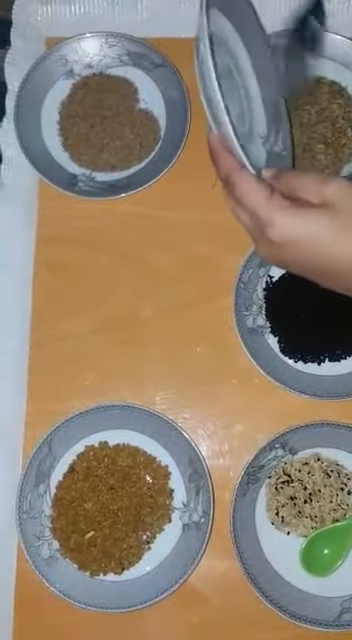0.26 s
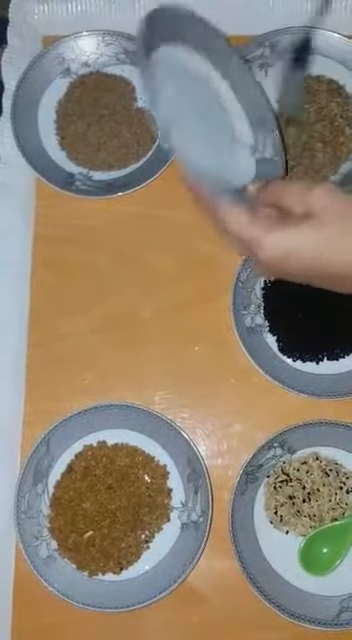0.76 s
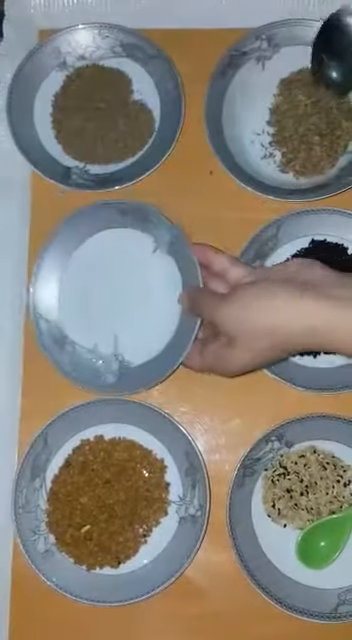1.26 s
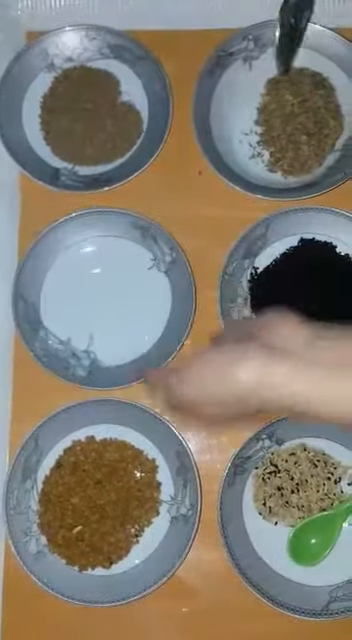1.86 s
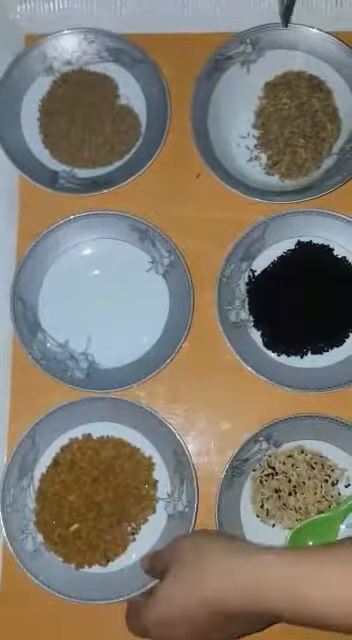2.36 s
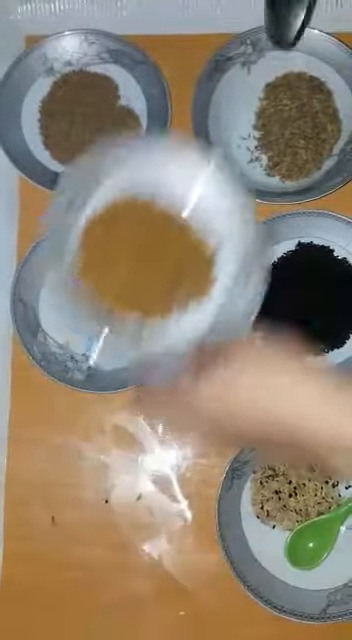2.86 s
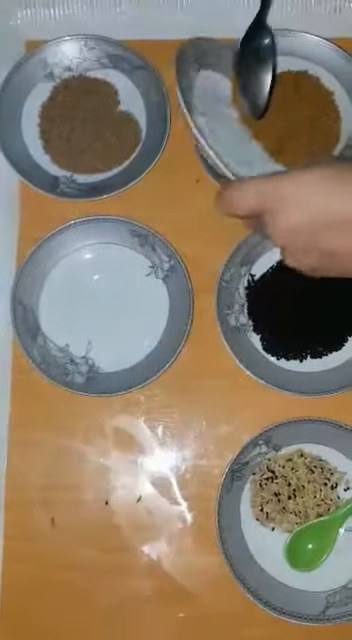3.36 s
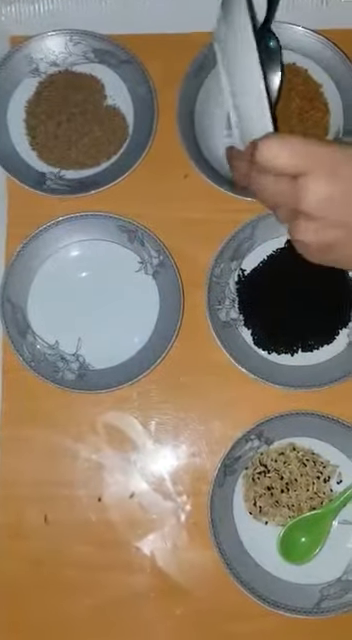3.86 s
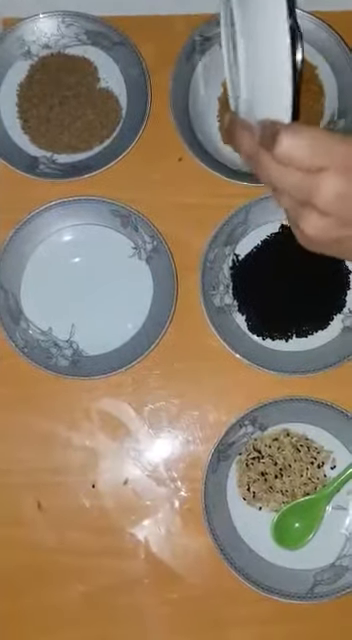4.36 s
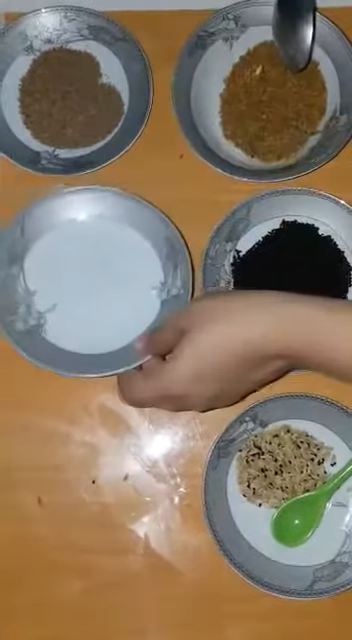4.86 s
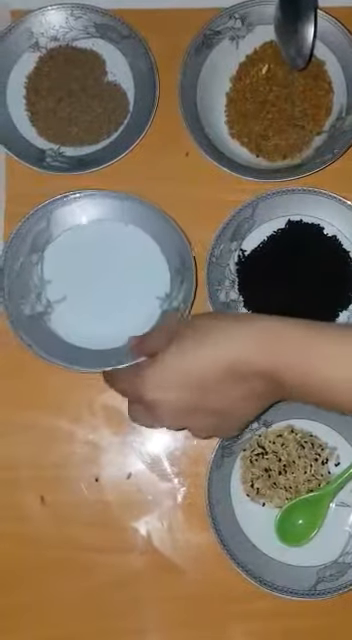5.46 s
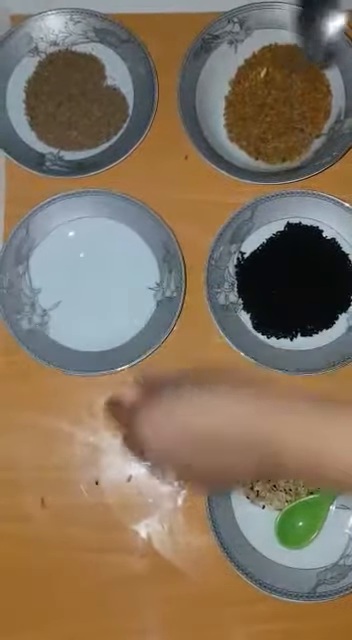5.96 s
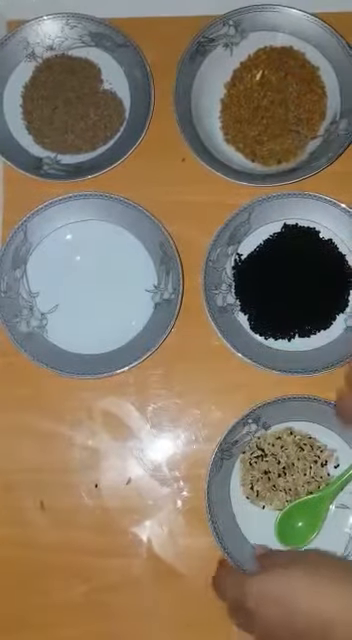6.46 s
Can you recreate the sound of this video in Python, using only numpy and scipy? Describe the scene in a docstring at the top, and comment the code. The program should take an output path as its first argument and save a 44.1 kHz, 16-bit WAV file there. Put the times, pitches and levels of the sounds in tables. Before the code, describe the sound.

In a small hard room with a steady low motor hum and faint hiss, a steel spoon rasps and clinks on a ceramic plate. The plate lands on a wooden table with a double knock and scuffs into place. Seeds then hiss from a second plate with a brief thin squeak, more spoon clinks follow, and that plate is clacked down and nudged. Close stereo microphone.

```python
"""A slow motor hums under everything, with room air and a thin band of hiss: summed partials and shaped noise.
First a steel spoon taps and scrapes a ceramic plate clean: ringing modes, and slip grains through resonances.
The plate is set down on a wooden table, knocking, dragging and nudged into place: board, plate and glaze modes.
Seeds are tipped from a second plate as filtered grains; its rim squeaks on the spoon, which taps and scrapes again.
That plate is set down, rocks and is nudged into place; a small hard room answers all the contacts."""
import sys
import numpy as np
from scipy import signal
from scipy.fft import rfft, irfft
from scipy.io import wavfile
from scipy.ndimage import uniform_filter1d

SR = 44100
rng = np.random.default_rng(int(sys.argv[2]) if len(sys.argv) > 2 else 0)


def generate_wav(sig):
    """Save sig (samples, or channels by samples) to the path in sys.argv[1] as 16-bit PCM at SR."""
    pcm = np.round(np.clip(np.atleast_2d(sig).T, -1, 1) * 32767).astype(np.int16)
    wavfile.write(sys.argv[1], SR, pcm)


N = 296352
T = np.arange(N) / SR
RING_T = np.arange(SR // 2) / SR

# modes of the wooden table: (f/Hz, level/dB, t60/s)
BOARD = [(201, -2.5, 0.031), (262.3, -2, 0.057), (315, -2, 0.067), (423, 1.5, 0.024), (500, -8.5, 0.056),
         (573, 1, 0.032), (720, 6, 0.01), (853, -0.5, 0.028), (1012, 3, 0.011), (1147, -6.5, 0.071),
         (1410, -19, 0.011)]
# modes of a plate damped by the hand: (f/Hz, level/dB, t60/s)
HELD_PLATE = [(840, -6.5, 0.022), (1376, 1, 0.014), (1544, 6.5, 0.023), (1618, 10, 0.016),
              (1868, 4.5, 0.019), (1942, 0, 0.025), (3020, -11, 0.019), (3785, -14.5, 0.0255)]
# modes of a plate tapped or rubbed by the spoon: (f/Hz, level/dB, t60/s)
PLATE = [(1518, -3, .12), (3050, -3, .13), (4690, -13, .12), (6525, -3, .15), (7251, -5, .16),
         (8600, -6, .06), (11000, -15, .06), (12130, -9, .05), (14600, -22, .06)]
# modes of the steel spoon: (f/Hz, level/dB, t60/s)
SPOON = [(4756, 0, .07), (4738, -13.5, .5), (7220, -15, .07), (8350, -20, .03), (9480, -17, .07),
         (11720, -15, .035)]
# colour of a click on the glaze: (f/Hz, density/dB per Hz)
CLICK = [(300, -4.5), (800, -6), (1300, 10), (2200, 3.5), (3200, 0), (3800, -1), (4500, -6), (6000, -11.5),
         (8500, -18), (10500, -28), (15500, -36.5)]
# colour of a small tick, from spoon or grit: (f/Hz, density/dB per Hz)
TICK = [(300, -24), (650, -10), (1000, 1.5), (1400, 2), (1900, 1.5), (2500, -8.5), (3800, -7.5),
        (5000, -5.5), (6000, -17), (7500, -6.5), (10800, -18), (12100, -13.5), (13200, -20), (15500, -22)]


def amp(db):
    """Decibels to linear gain."""
    return 10 ** (np.asarray(db) / 20)


def evened(x):
    """Scales a sound to rms 1."""
    return x / np.sqrt(np.mean(x ** 2) + 1e-20)


def struck(x, size=441):
    """Scales a blow to rms 1 over its first hundredth of a second."""
    return x / np.sqrt(np.mean(x[:size] ** 2))


def read(points, hz):
    """Reads a curve at given frequencies, straight between points on a log-frequency axis."""
    f, value = np.transpose(points)
    return np.interp(np.log(hz + 1), np.log(f + 1), value)


def add(mix, s, sound):
    """Lays a sound into the mix from the given second."""
    part = mix[max(round(s * SR), 0):][:len(sound)]
    part += sound[:len(part)]


def above(x, hz):
    """Fourth-order high-pass."""
    return signal.sosfilt(signal.butter(4, hz, "high", fs=SR, output="sos"), x)


def through(x, response):
    """Sends a sound through a resonating body and scales the result to rms 1."""
    return evened(signal.oaconvolve(x, response)[:N])


def causal(colour, size=2048):
    """Impulse response of a colour, with all its energy as early as possible."""
    hz = abs(np.fft.fftfreq(size, 1 / SR))
    log_gain = np.log(amp(read(colour, hz)))
    minimum_phase = np.exp(np.conj(signal.hilbert(log_gain)))
    return np.fft.ifft(minimum_phase).real


def swell(crest_s, db, rise_s, fall_s):
    """Gain of a movement that gathers to a crest and dies away."""
    width_s = np.where(T < crest_s, rise_s, fall_s)
    return amp(db) * np.exp(-np.minimum(((T - crest_s) / width_s) ** 2, 20))


def diffuse(colour):
    """Noise from all sides: most alike in both channels in the bass, hardly at all in the treble."""
    # left-right likeness of diffuse sound: (f/Hz, likeness 0..1)
    alike = [(100, 0.92), (300, 0.68), (600, 0.61), (1200, 0), (2500, 0.032), (15000, 0.023)]
    hz = np.fft.rfftfreq(N, 1 / SR)
    a, b = rfft(rng.standard_normal((2, N)))
    same = np.clip(read(alike, hz), -1, 1)
    pair = np.array([a, same * a + np.sqrt(1 - same ** 2) * b])
    return evened(irfft(pair * amp(read(colour, hz)), N))


def ring(modes, tuning=1, spread_db=0, favoured_hz=1000, falloff_db=0):
    """Dying sines, neighbours opposed in sign; the spot that is hit favours some modes over others."""
    hz, db, t60 = np.transpose(modes)[:, :, None]
    db = db + spread_db * rng.standard_normal(db.shape)
    db = db - falloff_db * abs(np.log2(hz / favoured_hz))  # dB lost per octave away
    sign = (-1) ** np.arange(len(modes))[:, None]
    decay = np.exp(-np.log(1000) * RING_T / t60)
    sines = np.sin(2 * np.pi * hz * tuning * RING_T)
    return struck((sign * amp(db) * decay * sines).sum(0))


def crack(colour, chatter, decay_s):
    """A sharp contact followed by a brief chatter of the two surfaces."""
    push = chatter * rng.standard_normal(len(RING_T)) * np.exp(-RING_T / decay_s)
    push[0] += 1
    return struck(signal.fftconvolve(push, causal(colour))[:len(push)])


def grains(per_s, spread_db):
    """Tiny contacts at random moments, a few much larger than the rest."""
    size = amp(spread_db * np.minimum(rng.exponential(1, N), 4))
    happens = rng.random(N) < per_s / SR
    return evened(size * rng.choice([-1, 1], N) * happens)


def grip(s):
    """The grip detunes spoon and plate: first plate in hand, second in hand, second on the table."""
    # how they are held: (from t/s, spoon tuning/ratio, plate tuning/ratio)
    grips = [(0, 1, 1), (2.6, 1.029, .975), (4.7, 1.008, 1.015)]
    return [row[1:] for row in grips if row[0] <= s][-1]


def background(motor_db=-54.5, air_db=-53, hiss_db=-62.5):
    """Motor hum on the multiples of its slightly wandering shaft speed, room air and a narrow hiss."""
    # motor partials: (multiple of shaft speed, level/dB)
    partials = [(2, -1), (3, -41), (4, 2), (5, -7), (6, -9.5), (7, -11.5), (8, -16), (9, -10), (10, -15),
                (11, -12), (12, -28), (13, -18.5), (16, -12.5)]
    # colour of the room air: (f/Hz, density/dB per Hz)
    air_colour = [(50, -4), (120, -8), (200, -6.5), (340, -11.5), (650, -12), (1300, -15), (2500, -23),
                  (4500, -32), (6200, -36), (8200, -34), (10000, -41.5), (15800, -41.5)]
    shaft_hz, hiss_hz, hiss_width_hz = 20.88, 7230, 380
    wander = uniform_filter1d(uniform_filter1d(rng.standard_normal(N), SR // 2), SR // 2)
    turns = shaft_hz * T + 0.01 * evened(wander)
    hum = sum(amp(db) * np.sqrt(2) * np.cos(2 * np.pi * (k * turns + rng.random())) for k, db in partials)
    hum = hum * amp([[-1.2], [1.2]])  # leans to the right
    band = np.exp(-.5 * ((np.fft.rfftfreq(N, 1 / SR) - hiss_hz) / hiss_width_hz) ** 2)
    hiss = evened(irfft(rfft(rng.standard_normal((2, N))) * band, N))
    return amp(motor_db) * hum + amp(air_db) * diffuse(air_colour) + amp(hiss_db) * hiss


def clinks(spoon_db=-12, plate_db=-12):
    """Each touch of steel on ceramic ticks and sets both ringing, the one at the expense of the other."""
    # touches: (t/s, strength/dB, lean/dB: spoon rings more and plate less, f/Hz the struck spot favours)
    touches = [(.012, -33.5, 9.5, 6230), (0.481, -27.5, 2.5, 12000), (.613, -37, 9, 1500),
               (1.3399, -27, -7.5, 6150), (3.6112, -32, 15.5, 6900), (3.817, -38.5, 4, 7360),
               (3.8943, -30, -5, 3000), (4.205, -34.5, -5.5, 1500), (4.343, -45, -4, 8600),
               (5.179, -42.5, 15, 3000), (5.377, -38.5, -1, 8700), (5.576, -42, -4.5, 8900),
               (5.796, -52, 0, 7570), (5.91, -55.5, -16, 3000), (6.680, -36.5, -6, 7000)]
    out = np.zeros(N)
    for s, strength, lean, favoured_hz in touches:
        spoon_tuning, plate_tuning = grip(s)
        spoon = ring(SPOON, spoon_tuning, favoured_hz=favoured_hz, falloff_db=5)
        plate = ring(PLATE, plate_tuning, favoured_hz=favoured_hz, falloff_db=10.0)
        add(out, s, amp(strength) * crack(TICK, chatter=1.0, decay_s=0.0018))
        add(out, s, amp(strength + spoon_db + lean) * spoon)
        add(out, s, amp(strength + plate_db - lean) * plate)
    return out


def scrapes(singing_db=-13, judder_db=2.0, grit_db=-6.5, ease_db=2.5):
    """An edge sticks and slips over the glaze, shaking spoon and plate."""
    # spoon strokes: (start t/s, end t/s, level/dB, growth of pressure along the stroke/dB, rim tone level/dB)
    strokes = [(0.02, .144, -29.5, 2, -75), (0.618, 0.784, -31.5, 3.5, -58), (4.201, 4.352, -51.5, 18, -47)]
    # resonances of spoon and plate pressed together: (f/Hz, width/Hz, level/dB)
    rubbed = [(1150, 590, 3), (1676, 206, 14), (3120, 610, 10), (3660, 630, 9), (4753, 316, 17),
              (5040, 880, 6), (6550, 690, 13), (7630, 43, 13), (8610, 370, 12), (9100, 330, -15),
              (10930, 2500, -0.5), (12500, 350, -6), (13540, 400, -1.5), (14500, 300, -10)]
    out = np.zeros(N)
    slips = above(grains(per_s=3600, spread_db=4.5), hz=830)
    judder = judder_db * evened(uniform_filter1d(rng.standard_normal(N), size=260))
    slips = slips * amp(judder)  # the grip catches and lets go
    hz, width, db = np.transpose(rubbed)[:, :, None]
    age = np.pi * width * RING_T
    swelling = amp(db) * width * age * np.exp(-age)  # each resonance swells and dies, with steep skirts
    for start, end, stroke_db, growth_db, tone_db in strokes:
        tuning = grip(start)[1]
        drive = slips[round(start * SR):round(end * SR)]
        drive = evened(drive) * signal.windows.tukey(len(drive), .12)
        along = np.linspace(-1, 1, len(drive))
        # the hand presses less at both ends of a stroke
        pressure = amp(stroke_db + growth_db * along / 2 - ease_db * along ** 2)
        body = (swelling * np.sin(2 * np.pi * hz * tuning * RING_T)).sum(0)
        tone = ring(PLATE[:1], tuning)  # near the rim the lowest plate mode speaks
        # middle plate modes and the spoon sing all along
        singing = ring(PLATE[2:5], tuning) + 0.11 * ring(SPOON[1:2])
        rasp = causal(CLICK, size=len(RING_T))  # the bare contact
        parts = [(0, body), (singing_db, singing), (grit_db, rasp)]
        response = sum(amp(part_db) * x / np.linalg.norm(x) for part_db, x in parts)
        add(out, start, signal.fftconvolve(drive * pressure, response))
        add(out, start, amp(tone_db) * signal.fftconvolve(drive, tone / np.linalg.norm(tone)))
    return out


def knocks(thud_db=-8, clack_db=-1, click_db=1.5, rise_s=0.00041, softening=.3, sing_db=-28):
    """The board thuds, the hand-damped plate clacks, the glaze clicks; strong, hard blows are the brightest."""
    # plate meets table: (t/s, strength/dB, hardness/dB: low flat on its foot, high on edge)
    blows = [(1.3395, -15.5, -8.5), (1.3835, -11, -15), (1.609, -28, -23), (1.678, -32, -20),
             (1.783, -26.5, -24), (1.802, -31, -10), (1.827, -12, -10.5), (1.830, -10.5, -14),
             (2.196, -29.5, -19.5), (2.243, -36, -11), (2.353, -37, -4.5), (2.448, -40, -4.5),
             (3.245, -33.5, -12), (3.339, -40, -23), (5.1784, -15.5, 3), (5.200, -22, -1.5),
             (5.3775, -21, -6), (5.389, -28, 9.5), (5.558, -51, 9), (5.575, -24.5, -8), (5.725, -42, -5.5),
             (5.76, -42.5, -3), (5.867, -37.5, -17.5), (5.9053, -31.5, -6), (6.68, -31, -8.5)]
    # the mode that sings on when the plate stands on its edge: (f/Hz, level/dB, t60/s)
    freed_plate = [(1668, 0, 0.24)]
    click_per_strength, click_per_hardness = 1.693, 0.26  # dB per dB
    out = np.zeros(N)
    for s, strength, hardness in blows:
        click = click_per_strength * strength + click_per_hardness * hardness
        blow_rise_s = rise_s * amp(-softening * (click + 45.0))  # gentle landings push more slowly
        landing = 1 - np.exp(-RING_T / blow_rise_s)
        add(out, s, amp(strength + thud_db) * ring(BOARD, spread_db=4.5) * landing)
        add(out, s, amp(strength + hardness + clack_db) * ring(HELD_PLATE))
        # weighted so that it comes out with edge blows, which leave the plate free
        add(out, s, amp(strength + 2 * hardness + sing_db) * ring(freed_plate))
        add(out, s, amp(click + click_db) * crack(CLICK, chatter=0.24, decay_s=0.006))
    return above(out, hz=132)  # the board is too small to radiate deep bass


def slides(slide_db=-10, grit_db=-14):
    """The plate's foot ring judders over the board, crunching stray grit."""
    # drags: (crest t/s, level/dB, rise/s, fall/s, hardness/dB: plate ring relative to board)
    drags = [(1.58, -35, 0.16, 0.061, -12), (5.419, -40, 0.0094, 0.18, -1), (5.76, -40.5, 0.072, 0.072, -3),
             (5.931, -34.5, 0.091, 0.057, -1.5), (6.611, -42.5, 0.16, .11, 3.5)]
    out = np.zeros(N)
    judder = grains(per_s=240, spread_db=6.5)
    grit = amp(grit_db) * through(judder, causal(TICK))
    for *movement, hardness in drags:
        bodies = ring(BOARD) + amp(hardness) * ring(HELD_PLATE)
        out += swell(*movement) * (through(judder, bodies) + grit)
    return amp(slide_db) * above(out, hz=170)


def seeds(pour_db=-2):
    """A dense patter of light seeds skids down the tilted plate in rushes."""
    # rushes of seeds: (crest t/s, level/dB, rise/s, fall/s)
    rushes = [(3.18, -42, 0.14, 0.14), (3.72, -49.5, 0.39, 0.19), (3.93, -55, 0.047, 0.047)]
    # colour of seeds on the plate: (f/Hz, density/dB per Hz)
    seed_colour = [(2000, -13), (4000, -11.5), (4900, 1.5), (5700, -15.5), (7300, 2), (8400, -11),
                   (9400, -15), (10300, -12), (10900, -2), (11450, -13), (12000, -2), (12600, -12),
                   (14700, -11), (15800, 2)]
    flow = sum(swell(*rush) for rush in rushes)
    patter = above(grains(per_s=2000, spread_db=4.5), hz=1470)
    return amp(pour_db) * flow * through(patter, causal(seed_colour))


def squeak(waver_hz=14):
    """The tilted plate's rim grazes the spoon once, and the rubbing keeps a few thin tones alive."""
    # modes of the rim: (f/Hz, level/dB, t60/s)
    rim = [(2717, 0, .25), (4497, -4, .15), (9158, -3, .25), (11780, -11, .1), (13900, -10, .04),
           (14836, -6, .08), (15600, -9, .1)]
    start_s, attack_s, hold_s = 3.205, .004, .065  # hold counts from the start
    level_db, fade_db_per_s = -48.5, 160
    age = T - start_s
    fade_db = fade_db_per_s * np.maximum(age - hold_s, 0)
    contact = np.clip(age / attack_s, 0, 1) * amp(level_db - fade_db)
    wavers = uniform_filter1d(rng.standard_normal((len(rim), N)), size=200, axis=1)
    tones = np.zeros(N)
    for (hz, db, t60), waver in zip(rim, wavers):
        turns = np.cumsum(hz + waver_hz * evened(waver)) / SR
        # the longest-ringing modes build up most
        tones += amp(db) * np.sqrt(t60) * np.sin(2 * np.pi * turns)
    return contact * evened(tones)


def room(x, lag_s, near_db, near_s, tail_db, build_s):
    """Direct sound, echoes from near surfaces, scatter from the dishes and the room's tail."""
    # near surfaces: (delay/ms, gain left, gain right)
    echoes = [(1.396, -0.047, -0.23), (4.06, 0.18, 0.069), (8.46, 0.11, 0.22), (18.26, -0.064, 0.12),
              (20.55, 0.14, 0.16)]
    # decay of the tail: (f/Hz, t60/s)
    tail_t60 = [(200, 1), (600, 0.47), (1600, 0.66), (4500, 0.62), (8000, 0.43), (15000, 0.57)]
    # colour of scatter and tail: (f/Hz, level/dB)
    colour = [(200, -2), (600, 6), (1600, 0.5), (4500, 1), (8000, 3), (15000, -3)]
    hz, t, z = signal.stft(diffuse(colour)[:, :SR], SR, nperseg=256)
    decay = np.exp(-np.log(1000) * t / read(tail_t60, hz)[:, None])
    tail = signal.istft(z * decay, SR, nperseg=256)[1][:, :SR]
    tail *= 1 - np.exp(-T[:SR] / build_s)
    near = diffuse(colour)[:, :SR] * np.exp(-T[:SR] / near_s)
    response = amp(tail_db) * tail / np.linalg.norm(tail[0])
    response = response + amp(near_db) * near / np.linalg.norm(near[0])
    response[[0, 1], [0, round(lag_s * SR)]] += 1  # direct sound: the left microphone is nearer
    for ms, left, right in echoes:
        response[:, round(ms * SR / 1000)] += left, right
    return signal.fftconvolve(x[None], response, axes=1)[:, :N]


def scene():
    """Table near and almost ahead, spoon to the side; scrapes and seeds take a more scattered path than taps."""
    taps = room(clinks(), lag_s=.000215, near_db=-4, near_s=0.0032, tail_db=-7, build_s=0.0024)
    rubbing = room(scrapes() + seeds(), lag_s=.000227, near_db=0, near_s=0.0046, tail_db=-9.0, build_s=0.0099)
    table = room(knocks() + slides() + squeak(),
                 lag_s=0.000096, near_db=-2.5, near_s=0.0046, tail_db=-8, build_s=0.0038)
    # left and right trims in dB
    contacts = table * amp([[-1], [0]]) + taps * amp([[-1], [0]]) + rubbing * amp([[-2], [-2.5]])
    return contacts + background()


def record(dry):
    """A steep linear-phase low-pass sets the upper band limit."""
    edge_hz = 15900
    low_pass = signal.firwin(401, edge_hz, window=("kaiser", 9), fs=SR)
    return signal.oaconvolve(dry, low_pass[None], "same")


dry = scene()
out = record(dry)
generate_wav(out)
```